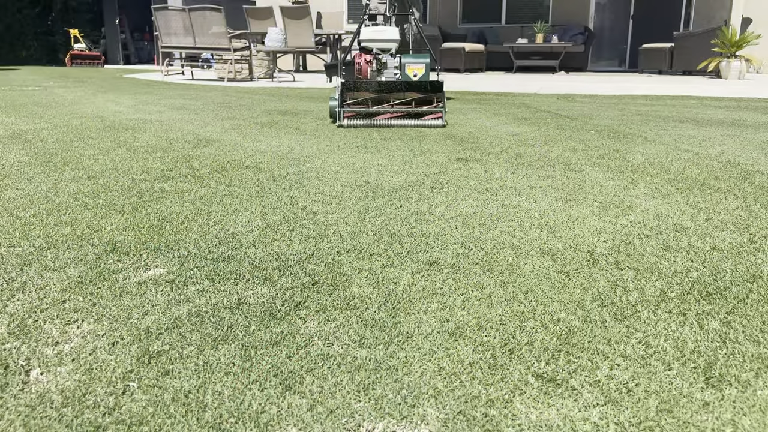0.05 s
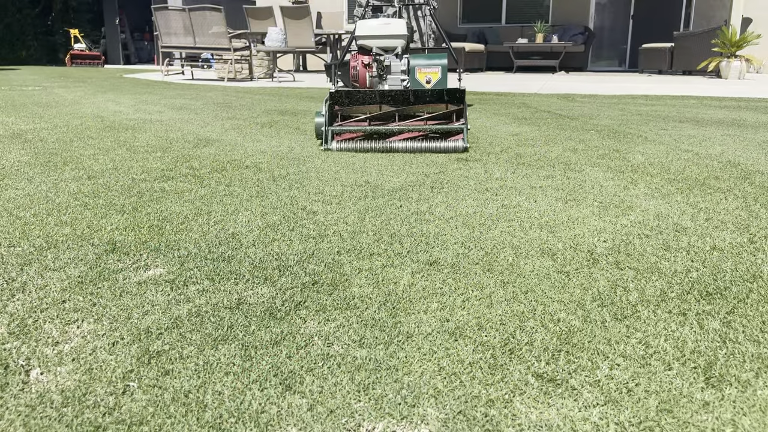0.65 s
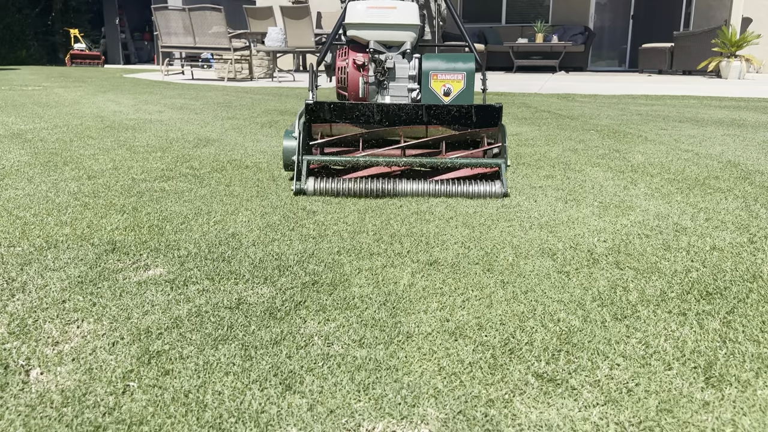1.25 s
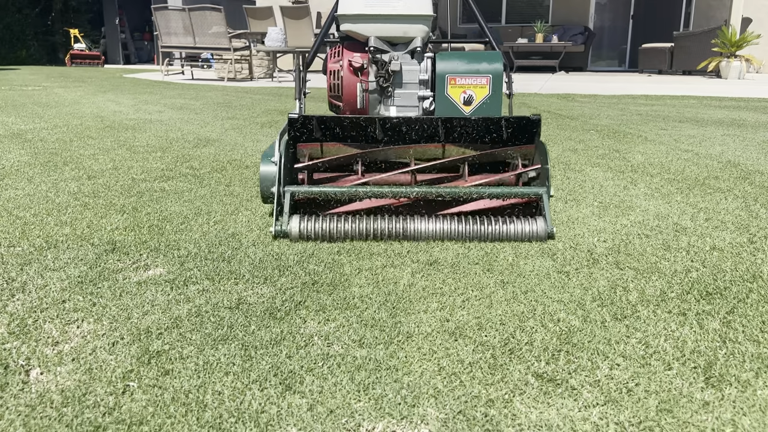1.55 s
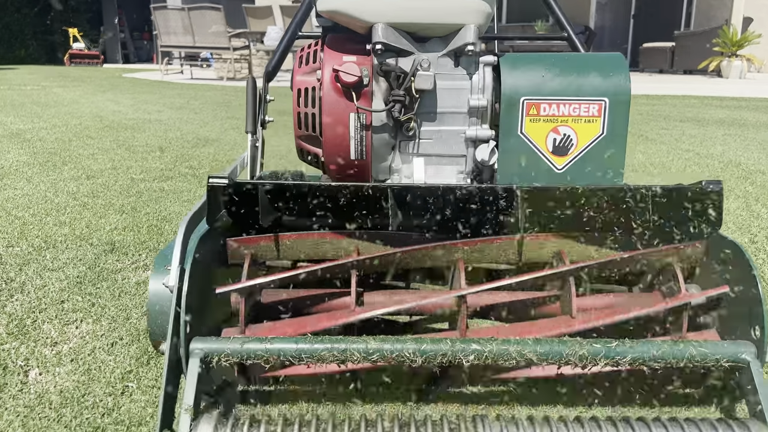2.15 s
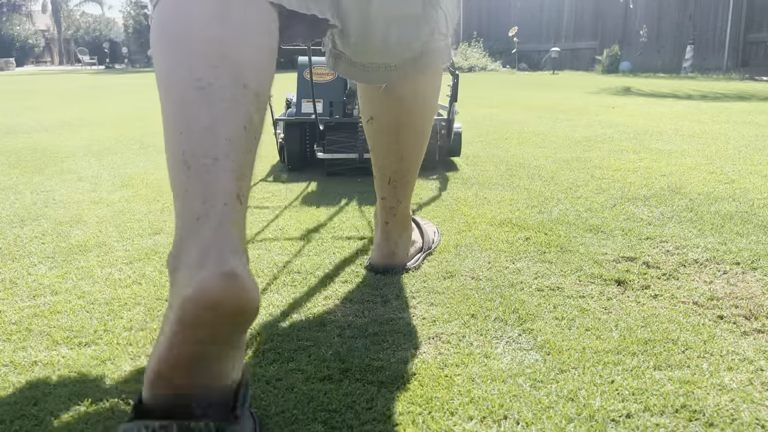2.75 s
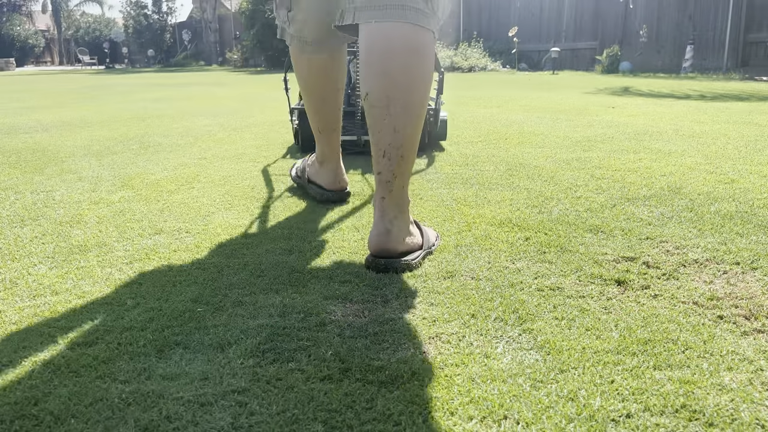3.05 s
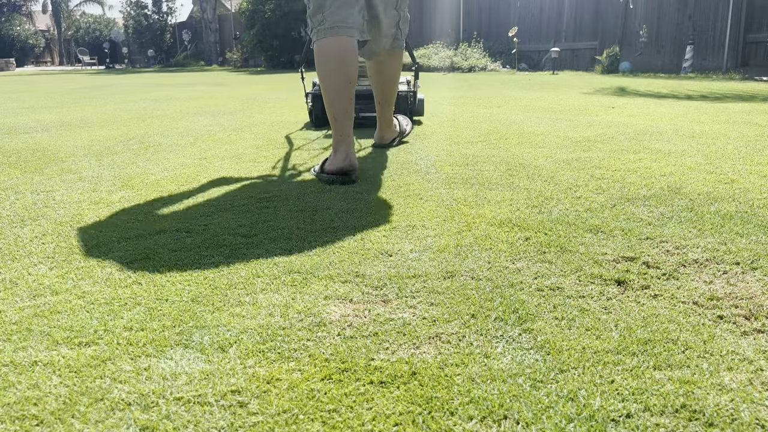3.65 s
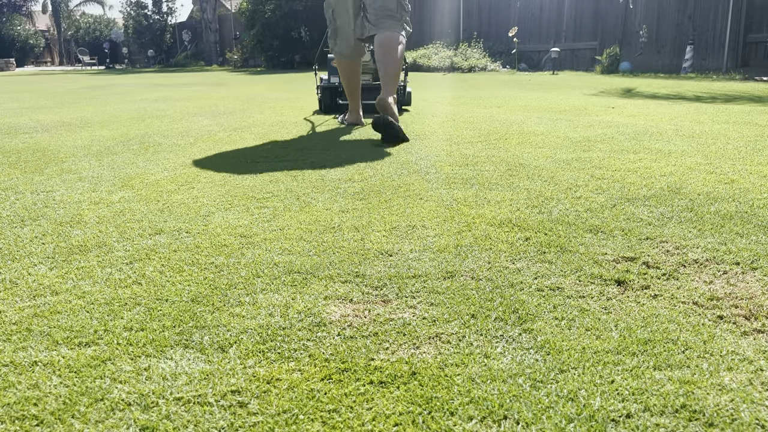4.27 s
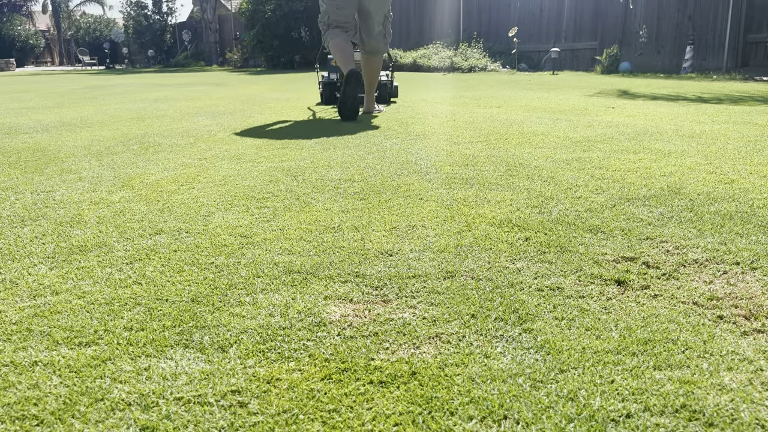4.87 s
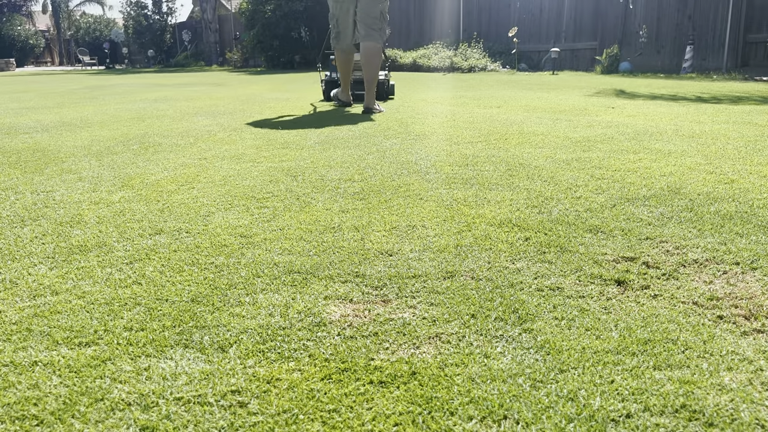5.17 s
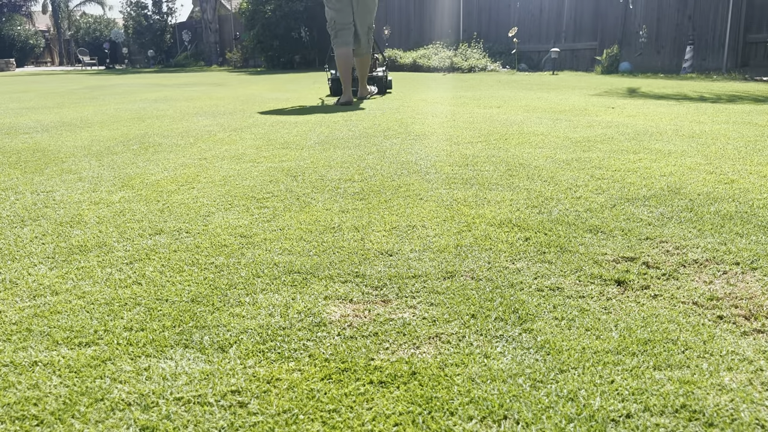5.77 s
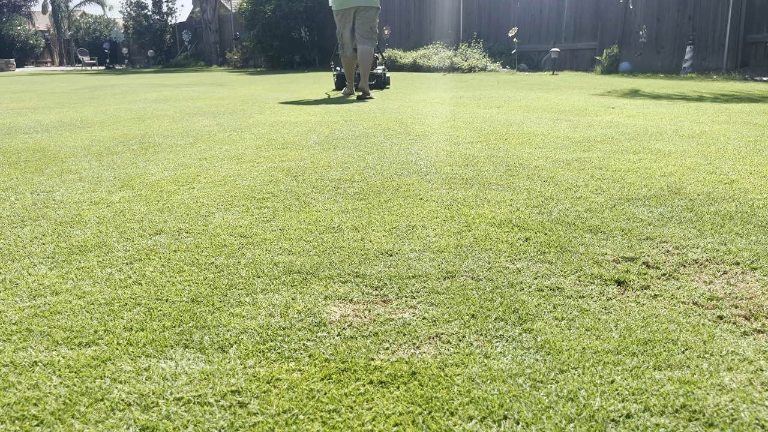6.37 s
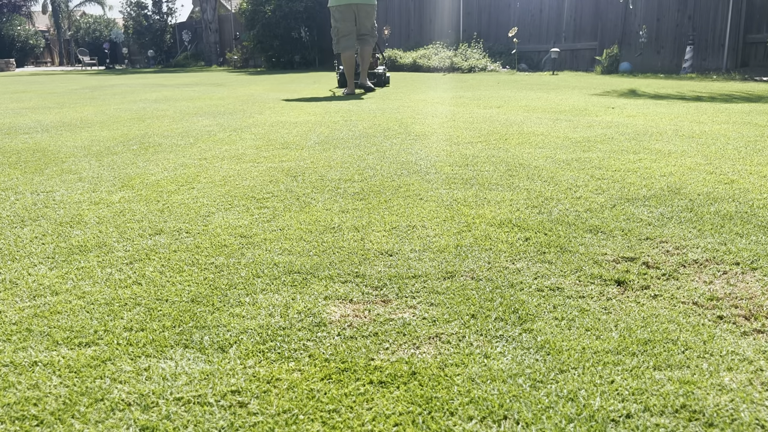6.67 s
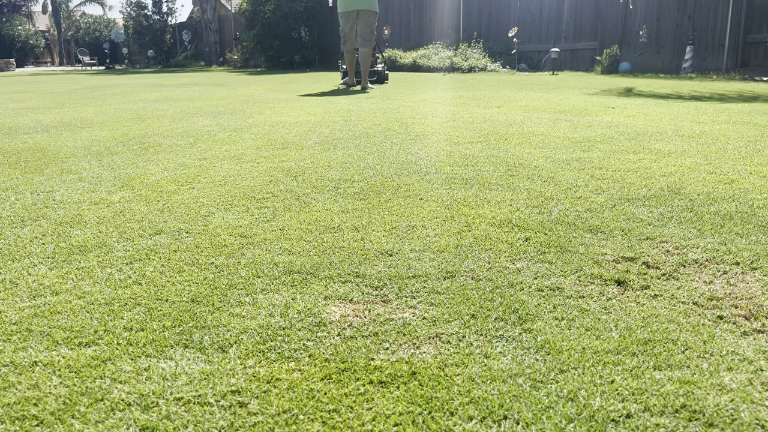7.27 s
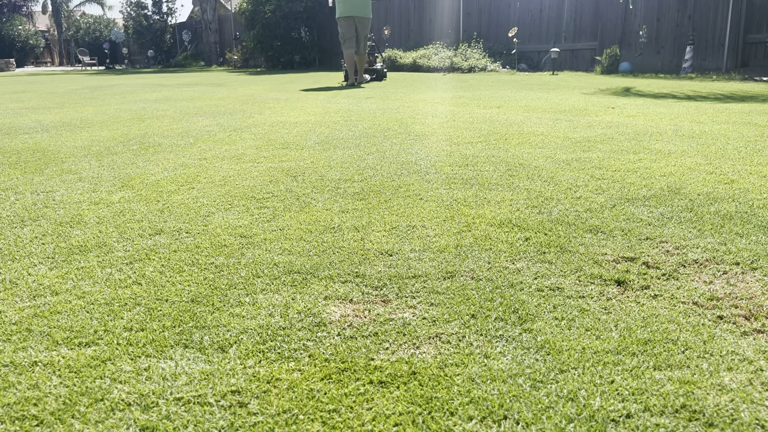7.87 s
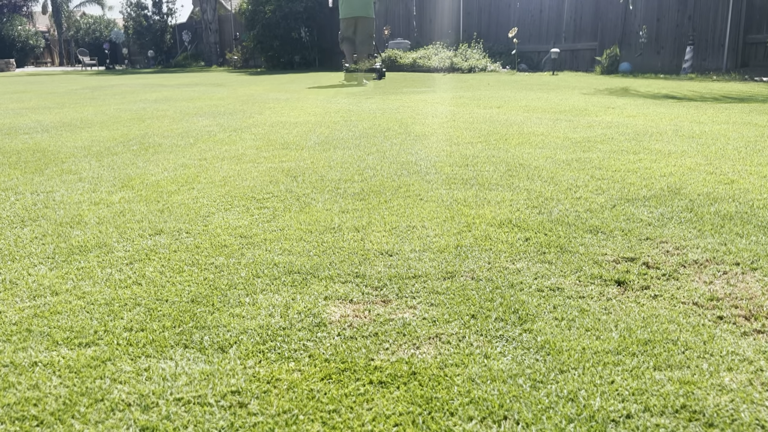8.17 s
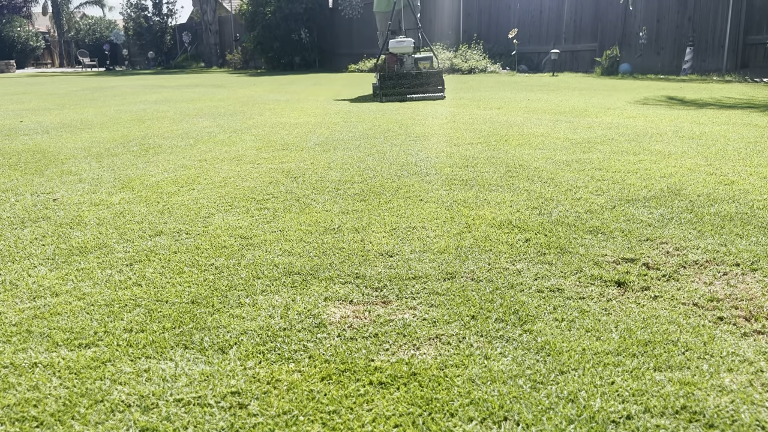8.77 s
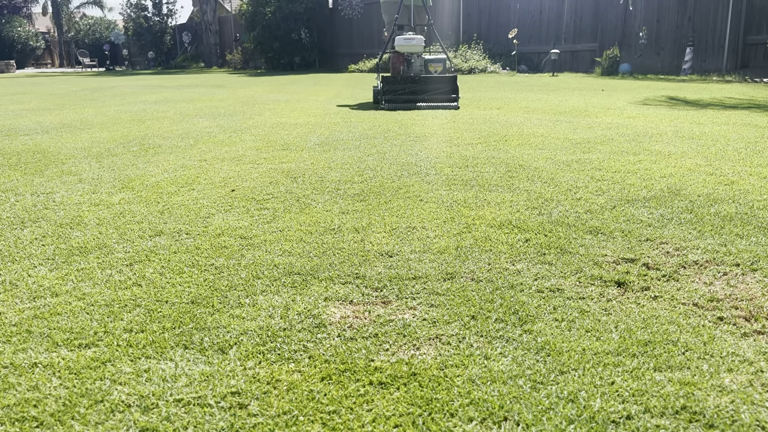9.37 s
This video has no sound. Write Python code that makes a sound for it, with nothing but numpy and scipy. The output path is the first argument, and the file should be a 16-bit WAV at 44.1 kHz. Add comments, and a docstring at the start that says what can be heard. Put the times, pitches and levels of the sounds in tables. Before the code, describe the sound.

A petrol reel mower runs at steady speed on a lawn, its engine thudding and clattering over a chain hum and the hiss of blades snipping grass. It comes right up to the microphone, growing louder, with a few cracking stalks. The sound then blends into a quieter putter moving away, with light metal clacks. Near the end the mower is louder again, approaching from a distance.

```python
"""Petrol reel mower on a lawn

A mower is walked up close, is heard from behind as it leaves, then returns from afar; the three views
dissolve into one another. Its one-cylinder four-stroke engine thuds through a muffler and clatters,
the chain drive hums, the blades snip grass and crack stalks, and the frame clacks over the turf.
Most parts grow louder as they near, and a far fence's echo makes thuds and hum swell and fade."""
import sys
import numpy as np
from scipy import signal
from scipy.fft import rfft, irfft, next_fast_len
from scipy.io import wavfile
from scipy.ndimage import uniform_filter1d, map_coordinates

SR = 44100
rng = np.random.default_rng(int(sys.argv[2]) if len(sys.argv) > 2 else 0)


def wav_out(sig):
    """Save sig, one row per channel (or a flat mono array), as 16-bit PCM at SR to the path in sys.argv[1]."""
    wavfile.write(sys.argv[1], SR, np.round(np.clip(np.atleast_2d(sig).T, -1, 1) * 32767).astype(np.int16))


N = 419832

# "per view" always runs coming, leaving, returning; the walk per view: (time [s], distance [m])
WALKS = [
    [(0, 2.5), (2.14, .68)],
    [(2.1, .75), (2.7, 1.2), (4.0, 2.2), (5.1, 3.25), (5.68, 3.79), (7.35, 5.15), (8.0, 5.48), (8.6, 5.65)],
    [(8.1, 4.69), (8.66, 4.37), (9.52, 3.88)],
]
# one view melts into the next: (start [s], end [s])
DISSOLVES = [(2.1, 2.71), (8.05, 8.68)]
REFERENCE_M, FENCE_M, SOUND_M_PER_S = 3, 14.65, 343  # the fence stands beyond the mower
# faders per view: (level at REFERENCE_M [dB], loss per doubling of distance [dB])
EXHAUST_MIX = [(-21.5, 2.5), (-32, 4), (-24, -0.5)]
CLATTER_MIX = [(-27.5, 5.43), (-43.5, 6.8), (-26.5, 9.6)]
HUM_MIX = [(-24, 4), (-40.5, 2.5), (-25, 5)]
HISS_MIX = [(-36, 3.54), (-47, 2.4), (-35, 5.9)]
SING_MIX = [(-55, -10), (-57, 4.5), (-63, 0)]

# the governor holds the engine near one speed: (time [s], firing rate [Hz])
FIRING_RATE = [(0.0, 31.65), (1.0, 32.03), (1.7, 31.48), (2.3, 32.23), (2.75, 31.5), (3.8, 31.83),
               (4.4, 31.53), (5.5, 31.57), (7.4, 31.43), (8.6, 31.98), (9.52, 31.88)]
# crank position per view: (offset [cycles])
CRANK = [-.048, -.004, .208]
# tone of the exhaust pulse: (multiple of the firing rate, relative level [dB])
PULSE_COMING = [(1, -30), (2, 1), (3, -1.5), (4, -11), (5, 1), (6, 2.5), (7, -1.5), (8, -4.5), (9, -30),
                (10, -11), (11, -7), (12, -16.5), (13, -10), (14, -14.5), (15, -9)]
PULSE_LEAVING = [(1, -30), (2, -5.5), (3, -10), (4, -1.5), (5, 2), (6, 3.5), (7, 1), (8, -5.5), (9, -11),
                 (10, -8), (11, -9), (12, -9), (13, -16.5), (14, -7), (15, -14), (16, -15.5)]
PULSE_RETURNING = [(1, -27), (2, -4.5), (3, -1.5), (4, -6), (5, 0.5), (6, 2), (7, -2), (8, -7.5), (9, -29),
                   (10, -12), (11, -10), (12, -19), (13, -15), (14, -15.5), (15, -21), (16, -20), (18, -21),
                   (21, -25), (22, -21)]
# the low end sinks and returns: (time [s], second harmonic gain [dB], third harmonic gain [dB])
THUD_BASS = [(0, -2, -1), (1.0, 2.5, 0), (2.0, 1, -2.5), (2.8, -1, 3.5), (4.4, 3, 4.5), (5.15, -8, -5),
             (5.8, 0, -1), (6.5, 5.5, 2), (7.3, 1, 0), (7.9, 1, 0), (8.55, 1, -1.5), (9.3, -1.5, -5)]
# the putter swells and sinks while leaving: (time [s], gain [dB])
THUD_SWELL = [(2.7, 1), (4.4, -1), (5.15, 0), (5.6, 1), (6.2, 0.5), (6.9, 1), (7.8, 0.5)]
# breathy gas noise of the muffler: (frequency [Hz], relative level [dB])
CHUFF = [(20, -23), (60, -3.5), (150, -8.5), (260, 1), (370, 4), (450, -1.5), (560, -3), (680, -13.5),
         (800, -14), (1100, -22)]
# echo with the mower's back or front to the fence; lows slip through: (frequency [Hz], gain [dB])
ECHO_BACK = [(60, -40), (95, -16), (127, -8), (158, -1.5), (190, 1), (222, 0), (254, -3), (330, -2)]
ECHO_FRONT = [(60, -40), (95, -16), (127, -5), (158, -1.5), (190, -0.5), (222, -9), (254, -8), (330, -2)]
# send to the fence per view, against the direct sound: (gain [dB])
EXHAUST_SEND_DB, HUM_SEND_DB = [2, 8.5, 14], [-8, -1, -8]

# valve and piston knocks: (place in the cycle [cycles], relative level [dB])
KNOCKS = [(0.069, -11.5), (.16, -12), (0.64, -7.5), (0.78, -24.5)]
# the engine sits high on the frame; per view: (nearest distance [m])
ENGINE_NEAREST_M = [.82, 1.45, 3]
# colour of the clatter from four positions: (frequency [Hz], relative level [dB])
CLATTER_FRONT = [(450, -13), (680, 1), (930, -6), (1050, -6), (1220, 0), (1330, -2.5), (1520, 1),
                 (1650, -4.5), (2000, 1), (2450, -0.5), (3000, -4.5), (3500, -9.5), (4500, -4.5)]
CLATTER_CLOSE = [(450, 6), (700, 4.5), (890, 1), (980, 5.5), (1180, 3), (1350, 3.5), (1650, 2), (2300, -3),
                 (2750, -5.5), (3100, -5), (3500, -11), (5000, -16), (7000, -16)]
CLATTER_REAR = [(450, -23), (700, 2), (880, -5), (990, 0.5), (1170, -1), (1320, 1), (1500, 2), (1700, -3.5),
                (1870, 3), (2100, 0), (2650, 1.5), (3500, -7.5), (4500, -16)]
CLATTER_FAR = [(450, -12), (680, -0.5), (930, -7), (1050, -5), (1300, 1.5), (1520, 0), (1650, -4),
               (2000, -1.5), (2450, -4), (3000, -2.5), (3500, -10), (4500, -5)]
# ring of the engine casing and the reel's deck: (frequency [Hz], width [Hz], relative level [dB])
CASING_MODES = [(1133, 55, -0.5), (1303, 38, 10), (1532, 116, 3), (1780, 21, -13), (2000, 26, 1),
                (2230, 21, 2), (2446, 43, -9), (3025, 28, -2), (4500, 340, -20)]
DECK_MODES = [(1313, 54, -2), (1400, 78, -3), (1530, 47, -14)]
# buzz of the chain: (multiple of the tooth rate, relative level [dB])
CHAIN_BUZZ = [(2, 6), (3, 4.5), (4, 2.5), (6, 0.5), (7, 4)]

# colour of the cutting hiss: (frequency [Hz], relative level [dB])
HISS_FRONT = [(2300, -30), (3200, -2.5), (3700, -1.5), (4450, 0.5), (5300, -3.5), (6300, -3.5),
              (7400, -4.5), (9000, -7.5), (10300, -9.5), (12000, -9), (20000, -13)]
HISS_REAR = [(2300, -30), (3200, 0), (4500, 0), (5600, -2.5), (7000, -3), (9000, -4.5), (10000, -7.5),
             (11700, -6), (20000, -11)]
# ring of the steel reel: (frequency [Hz], width [Hz], relative level [dB])
BLADES_FRONT = [(2400, 200, -1.5), (4400, 530, 1.5), (5340, 300, -4), (6330, 420, 0.5), (7300, 200, -1),
                (7780, 240, -2), (8800, 360, -2)]
BLADES_REAR = [(3910, 70, 1.5), (4480, 300, -1.5), (6360, 140, -1.5), (7170, 130, 0.5), (7990, 280, 2)]
# that ring while leaving: (time [s], level against the hiss [dB])
REAR_RING = [(2.8, -1.5), (3.6, -12), (4.2, -5.5), (4.9, -7), (5.25, -5), (5.7, -3), (6.3, -4), (8.0, -1.5)]
# stalks caught by the blades: (time [s], relative level [dB])
SNAPS = [(.2533, -25), (0.9298, -16.5), (0.943, -20), (1.145, -20), (1.7938, -19), (1.9265, -20),
         (1.989, -21), (2.357, -16), (2.385, -18), (2.4064, -13.5), (2.862, -32), (3.338, -34),
         (3.5379, -32), (4.08, -38), (8.618, -25), (9.1062, -27), (9.283, -26)]
# jolts of the frame: (time [s], level [dB])
CLACKS = [(.816, -22), (1.157, -22), (1.31, -25), (2.852, -36), (2.975, -37), (3.05, -38), (3.118, -38),
          (3.34, -39), (4.085, -43), (4.205, -39), (4.363, -43), (4.77, -41), (5.38, -45), (6.26, -44),
          (8.0, -46), (9.31, -31), (9.445, -30)]
# crisp snap and steely clack: (frequency [Hz], relative level [dB])
SNAP_COLOUR = [(2000, -6), (3000, 1), (5000, 0), (11000, -3), (20000, -11)]
CLACK_COLOUR = [(1500, -6), (2300, 0), (3200, -4), (4500, -5), (6500, -11), (9000, -19)]

# stereo image of the noises: (frequency [Hz], left-right correlation)
CORRELATION = [(100, 0.8), (300, 0.91), (700, 0.89), (1400, 0.92), (2600, 0.7), (4300, 0.51), (5600, 0.34),
               (7500, 0.3), (9000, 0.16), (14000, 0.12)]
# the reel reaches the left microphone port first; per view: (lead at 1 m [samples])
LEAD_SAMPLES = [5.36, 3.4, 9.7]
# colour of the two ports: (frequency [Hz], left minus right [dB])
PORT_BALANCE = [(60, 0), (110, 1), (200, 2), (380, 0.5), (700, 1), (1290, 1.5), (2380, -1.5), (4400, 2.5),
                (8120, 1.5), (15000, -1)]
# phase between them: (frequency [Hz], left lead [rad])
PORT_PHASE = [(300, -0.068), (1900, -0.59), (2900, 0.46), (4300, -0.026), (6500, -0.85), (8000, -0.56),
              (15000, -0.24)]


def amp(db):
    """Decibels to gain."""
    return 10 ** (np.asarray(db) / 20)


def unit(x):
    """Scale to rms 1."""
    return x / np.sqrt(np.mean(x ** 2) + 1e-20)


def along(points, hz):
    """Read (frequency [Hz], value) points on a log axis."""
    f, v = np.transpose(points)
    return np.interp(np.log(hz + 1), np.log(f + 1), v)


def curves(rows):
    """One automation curve for each column after the time."""
    times, *columns = np.transpose(rows)
    return [np.interp(np.arange(N) / SR, times, column) for column in columns]


def wobble(rate):
    """A smooth random curve, rate knots a second."""
    return map_coordinates(rng.standard_normal(int(N * rate / SR) + 4), [np.arange(N) * rate / SR])


def noise():
    """Two unrelated white noises."""
    return rng.standard_normal((2, N))


def burst(cycle, width, at=0):
    """A smooth bump once a cycle; width and position are shares of the cycle."""
    return np.exp((np.cos(2 * np.pi * (cycle - at)) - 1) / (2 * np.pi * width) ** 2)


def filtered(x, response):
    """Equalise x with a response of frequency."""
    size = next_fast_len(N + 8192)
    return irfft(rfft(x, size) * response(np.fft.rfftfreq(size, 1 / SR)), size)[..., :N]


def spread(pair, colour):
    """Colour two unrelated signals and mix them to stereo: narrow bass, wide treble."""
    def response(hz):
        angle = np.arccos(np.clip(along(CORRELATION, hz), -1, 1)) / 2
        roll_off = 1 / (1 + (hz / colour[-1][0]) ** 12) / (1 + (colour[0][0] / (hz + 1)) ** 4)
        return amp(along(colour, hz)) * roll_off * [np.cos(angle), np.sin(angle)]
    mid, side = filtered(pair, response)
    return unit(np.array([mid + side, mid - side]))


def modes(x, table):
    """Ring x through resonances: (frequency [Hz], width [Hz], relative level [dB])."""
    def response(hz):
        return sum((-1) ** k * amp(db) * 1j * hz * width / (centre ** 2 - hz ** 2 + 1j * hz * width)
                   for k, (centre, width, db) in enumerate(table))
    return unit(filtered(x, response))


def delayed(x, samples, order):
    """x heard later by a changing number of samples."""
    return map_coordinates(x, [np.arange(N) - samples], order=order, mode="nearest")


def shimmer(x, depth_db):
    """Patches of the spectrum swell and fade, each about 200 Hz wide and a third of a second long."""
    spectrum = signal.stft(x, nperseg=1024)[2]
    patches = rng.standard_normal(spectrum.shape[1:])
    for _ in range(2):
        patches = uniform_filter1d(uniform_filter1d(patches, size=4, axis=0), size=22, axis=1)
    return unit(signal.istft(spectrum * amp(depth_db * unit(patches)), nperseg=1024)[1][:, :N])


def views():
    """Crossfade weights of the coming, leaving and returning views."""
    ramps = [curves([(start, 0), (end, 1)])[0] for start, end in DISSOLVES]
    first, second = np.sin(np.pi / 2 * np.array(ramps)) ** 2
    return np.array([1 - first, first - second, second])


def heard(mix, view, metres):
    """Gain of one part in each view: distance rides its fader."""
    return np.array([weight * amp(db - loss_db * np.log2(distance / REFERENCE_M))
                     for (db, loss_db), weight, distance in zip(mix, view, metres)])


def thuds(cycle, harmonics, smear, skew, scatter_db, intake, afterpuff):
    """One round exhaust pulse per firing, smeared by the muffler, and a weak puff half a cycle on."""
    deepest, centre = 3, 6  # harmonic numbers
    strength_db, jitter = scatter_db * wobble(32), 0.0047 * wobble(32)
    puff = afterpuff + 0.06 * wobble(32)
    bass_db = dict(enumerate(curves(THUD_BASS), start=2))
    pulses = np.zeros(N)
    for k, db in harmonics:
        timing = cycle + jitter - intake * (k <= deepest)  # the lows come later, from the intake
        phase = 2 * np.pi * k * timing + skew + smear * (k - centre) ** 2 + puff * (-1) ** k
        pulses += amp(db + strength_db * k / centre + bass_db.get(k, 0)) * np.cos(phase)
    return unit(pulses)


def with_fence(sounds, send_db, metres):
    """Add the fence's echo to each view; the detour changes with the walk, so notches sweep through."""
    colours = ECHO_BACK, ECHO_FRONT, ECHO_BACK
    echoes = filtered(np.array(sounds), lambda hz: amp([along(colour, hz) for colour in colours]))
    mixed = []
    for direct, echo, db, distance in zip(sounds, echoes, send_db, metres):
        detour = 2 * (FENCE_M - distance)
        late = delayed(echo, detour / SOUND_M_PER_S * SR, order=1)
        mixed.append(direct + amp(db) * distance / (distance + detour) * late)
    return np.array(mixed)


def exhaust(firings, cycle, view, metres):
    """The muffler thuds, echoed by the fence, with a chuff of turbulent gas on each firing."""
    coming = thuds(firings + CRANK[0], PULSE_COMING,
                   smear=0.095, skew=-2.14, scatter_db=0.5, intake=0.42, afterpuff=0.17)
    leaving = thuds(firings + CRANK[1], PULSE_LEAVING,
                    smear=-0.064, skew=0.73, scatter_db=1.0, intake=0.08, afterpuff=0.13)
    leaving *= amp(curves(THUD_SWELL)[0])
    returning = thuds(firings + CRANK[2], PULSE_RETURNING,
                      smear=0.085, skew=-1.26, scatter_db=0.7, intake=0.32, afterpuff=0.11)
    putter = with_fence([coming, leaving, returning], EXHAUST_SEND_DB, metres)
    from_behind = view[1]
    gas_flow = 1 + (0.2 + 0.19 * from_behind) * burst(cycle, width=0.047, at=0.14)
    chuff = amp(-4.5 - 2.1 * from_behind) * spread(noise() * gas_flow, CHUFF)
    gain = heard(EXHAUST_MIX, view, metres)
    return (gain * putter).sum(axis=0) + np.linalg.norm(gain, axis=0) * chuff


def clatter(cycle, view, metres):
    """Valves and piston knock each cycle: the casing rings, thin panels clank and loose parts rattle."""
    panel_t60_s, close_from_m, close_full_m, deck_at_m, deck_span_m = 0.16, 1.9, 0.9, 1.1, 0.14
    blows = np.zeros(N)
    rattle = 1 + 0.023 * burst(cycle * 5 / 6, width=0.36)
    for at, db in KNOCKS:
        since = (cycle - at) % 1
        strikes = np.diff(since, prepend=0) < 0
        blows += strikes * amp(db + 3.7 * wobble(32))
        rattle += 0.16 * amp(db) * np.exp(-since / 0.055)
    rattle *= amp(0.5 * wobble(70))
    t = np.arange(SR // 10) / SR
    panels = rng.standard_normal((2, len(t))) * amp(-60 * t / panel_t60_s)
    clank = unit(signal.fftconvolve(blows[None], panels, axes=1)[:, :N])
    grit = shimmer(unit(noise() * rattle) + amp(-6) * clank, depth_db=1.2)

    engine_m = np.maximum(metres, np.reshape(ENGINE_NEAREST_M, (-1, 1)))
    coming, leaving, returning = heard(CLATTER_MIX, view, engine_m)
    close = coming * np.clip((close_from_m - metres[0]) / (close_from_m - close_full_m), 0, 1)
    front = coming - close
    wash = front * spread(grit, CLATTER_FRONT) + close * spread(grit, CLATTER_CLOSE)
    wash += leaving * spread(grit, CLATTER_REAR) + returning * spread(grit, CLATTER_FAR)
    casing_gain = amp(-6.5) * front + amp(-15) * close + amp(-14.5) * leaving + amp(-10) * returning
    beam = np.exp(-((metres[0] - deck_at_m) / deck_span_m) ** 2)  # the deck briefly faces the listener
    deck = amp(-6) * coming * beam * modes(noise()[0] * rattle, DECK_MODES)
    return wash + casing_gain * modes(blows, CASING_MODES) + deck


def chain_drive(mesh, view, metres):
    """The chain hums at its tooth rate, wavering with the load; its links add a metallic buzz."""
    hidden_m, hidden_db_per_m = 0.96, 67  # up close the deck masks the hum
    tone = amp(0.7 * wobble(9.7) + 1.1 * wobble(24)) * unit(np.sin(2 * np.pi * mesh))
    shadow = amp(-hidden_db_per_m * np.maximum(hidden_m - metres, 0))
    hum = shadow * heard(HUM_MIX, view, metres) * with_fence([tone] * len(view), HUM_SEND_DB, metres)
    buzz = unit(sum(amp(db + 4.8 * wobble(20)) * np.sin(2 * np.pi * k * mesh + 0.42 * wobble(40))
                    for k, db in CHAIN_BUZZ))
    buzz_gain = heard(CLATTER_MIX, view, metres).sum(axis=0) * amp(-11.5 - 1.1 * view[1])
    return hum.sum(axis=0) + buzz_gain * buzz


def reel(cycle, mesh, view, metres):
    """Blades shear grass in quick strokes: a shifting hiss of tiny snips that keeps the steel ringing."""
    coming, leaving, returning = heard(HISS_MIX, view, metres)
    front = coming + returning
    # the reel and its chain are geared to the crankshaft
    strokes = 1 + 0.26 * burst(cycle * 5 / 6, width=0.12) + 0.11 * burst(cycle * 4 / 3, width=0.084)
    strokes += 0.13 * burst(mesh, width=0.27)
    strokes *= amp(1.2 * wobble(900) + 1.2 * wobble(22))
    snips = shimmer(noise() * strokes, depth_db=1.5)
    scrape = spread(shimmer(noise() * strokes, depth_db=2.8), [(1000, 0), (15000, 0)])
    hiss = front * spread(snips, HISS_FRONT) + leaving * spread(snips, HISS_REAR)
    front_ring = amp(1) * front * modes(scrape, BLADES_FRONT)
    rear_ring = amp(curves(REAR_RING)[0]) * leaving * modes(scrape, BLADES_REAR)
    return hiss + front_ring + rear_ring


def blade_song(view, metres, pitch_hz=2544):
    """A blade grazes the bed knife: a thin, rough steel tone that comes and goes."""
    swing = amp(2.5 * wobble(3.13) + 1.4 * wobble(14))
    graze = modes(noise()[0], [(pitch_hz, 50, 0)])
    tone = modes(graze, [(pitch_hz, 70, 0)])
    return heard(SING_MIX, view, metres).sum(axis=0) * swing * tone


def stalk_snaps(crack_t60_s=0.012, tail_t60_s=0.1):
    """Tougher stalks crack between blade and bed knife."""
    t = np.arange(SR // 10) / SR
    snap = 0.5 * amp(-60 * t / crack_t60_s) + 0.75 * amp(-60 * t / tail_t60_s)
    envelope = np.zeros(N)
    for s, db in SNAPS:
        envelope[round(s * SR):][:len(t)] += amp(db) * snap
    return amp(-7.5) * envelope * spread(noise(), SNAP_COLOUR)


def frame_clacks(t60_s=0.13):
    """Loose steel parts knock together as the frame jolts over the turf."""
    t = np.arange(SR // 5) / SR
    jolts = np.zeros(N)
    for s, db in CLACKS:
        jolts[round(s * SR)] = amp(db)
    envelope = signal.fftconvolve(jolts, amp(-60 * t / t60_s))[:N]
    return envelope * spread(noise(), CLACK_COLOUR)


def scene():
    """One crankshaft times engine, chain and reel, and the walk rides their levels."""
    teeth_per_firing, engine_lead_share = 10.5, 0.66  # the engine is more central than the reel's ends
    view = views()
    metres = np.array([curves(walk)[0] for walk in WALKS])
    firings = np.cumsum(curves(FIRING_RATE)[0]) / SR
    cycle = firings + np.dot(CRANK, view)
    mesh = teeth_per_firing * firings + 0.08 * wobble(9)
    engine = exhaust(firings, cycle, view, metres) + clatter(cycle, view, metres)
    engine += chain_drive(mesh, view, metres)
    cutting = reel(cycle, mesh, view, metres) + blade_song(view, metres) + stalk_snaps() + frame_clacks()
    lead = np.dot(LEAD_SAMPLES, view / metres)
    right = delayed(engine[1], engine_lead_share * lead, order=3) + delayed(cutting[1], lead, order=5)
    return np.array([engine[0] + cutting[0], right])


def record(dry):
    """The two microphone ports differ slightly in colour and phase; the very top end is cut off."""
    top_hz, half = 15850, np.array([[0.5], [-0.5]])
    def response(hz):
        balance = amp(along(PORT_BALANCE, hz) * half)
        return balance * np.exp(1j * along(PORT_PHASE, hz) * half) * (hz < top_hz)
    return filtered(dry, response)


dry = scene()
out = record(dry)
wav_out(out)
```